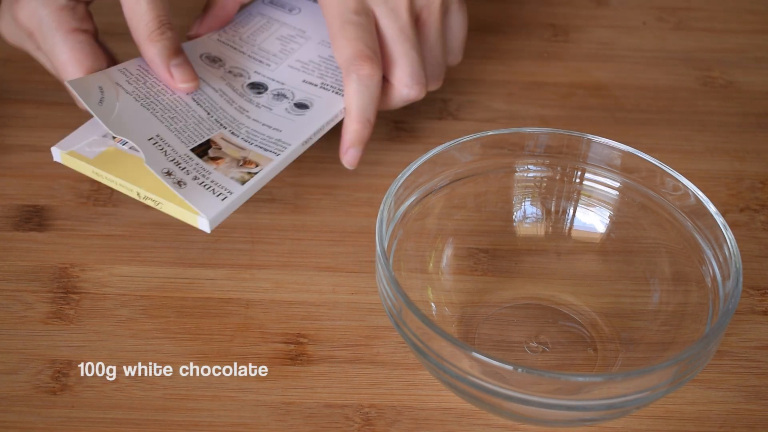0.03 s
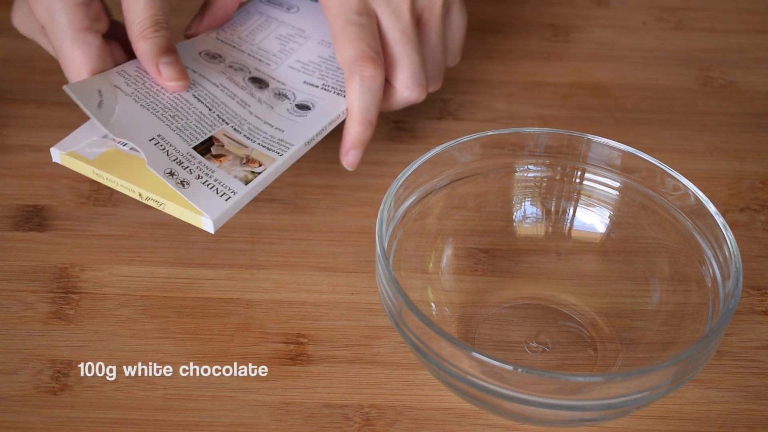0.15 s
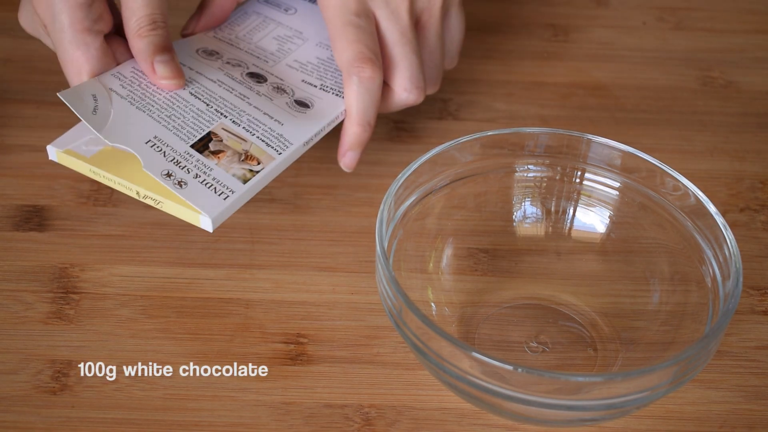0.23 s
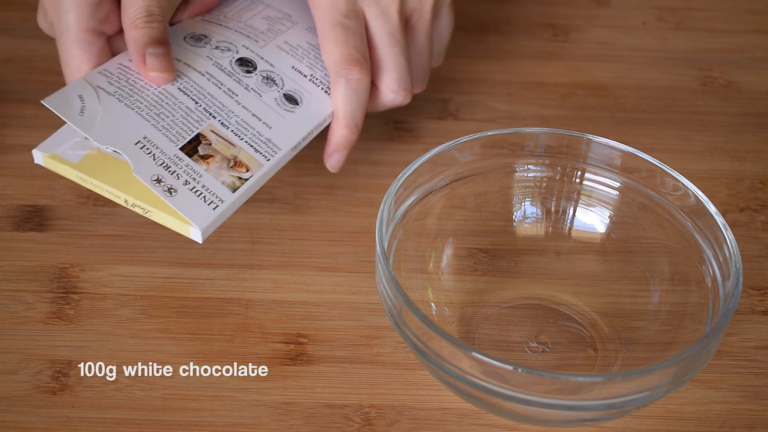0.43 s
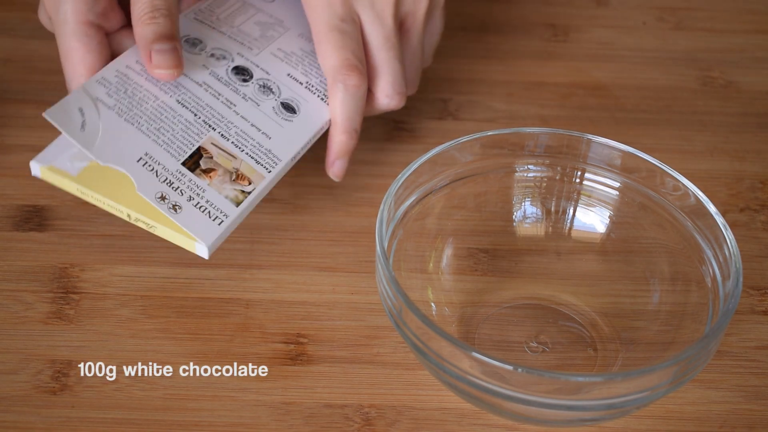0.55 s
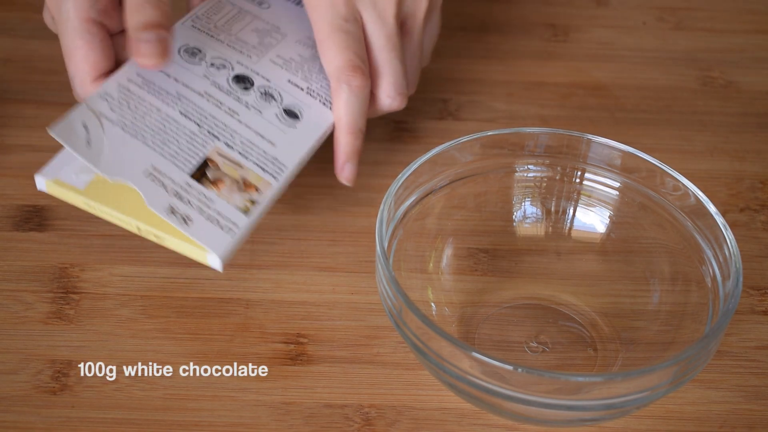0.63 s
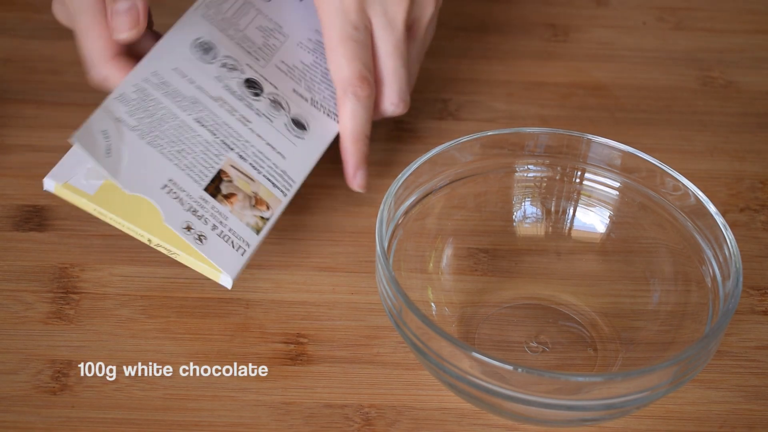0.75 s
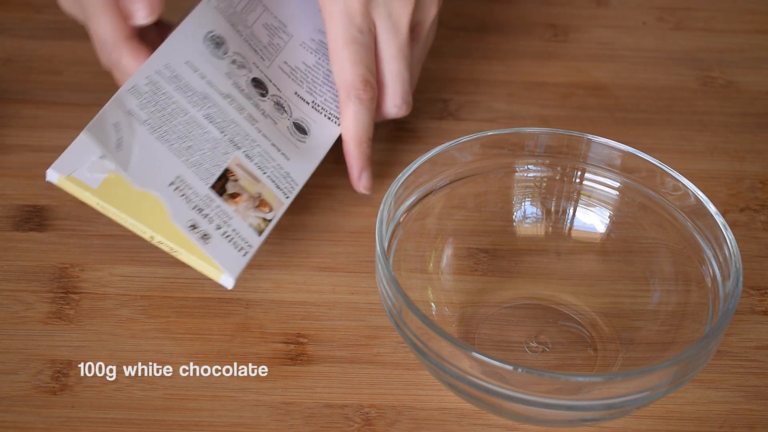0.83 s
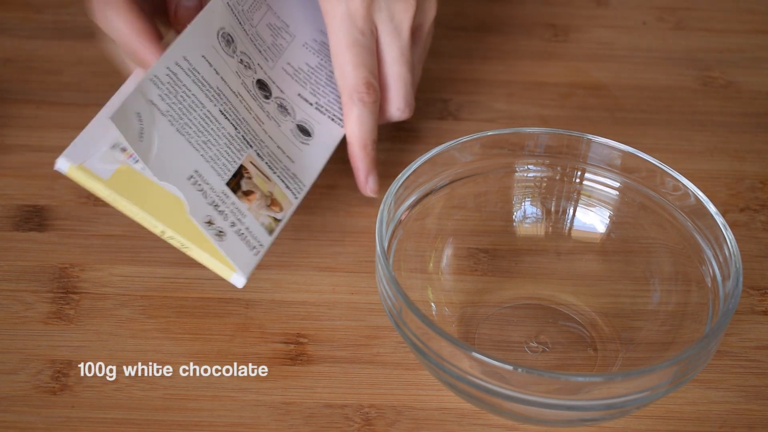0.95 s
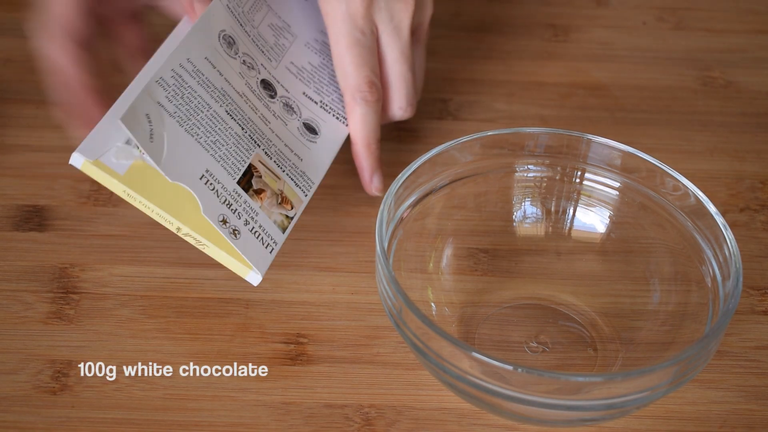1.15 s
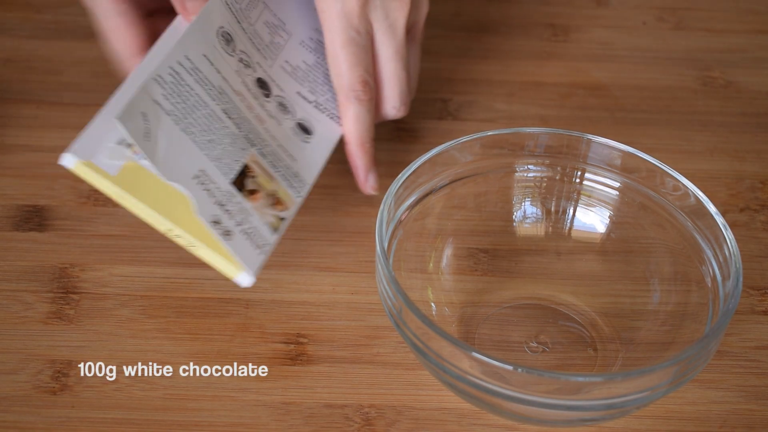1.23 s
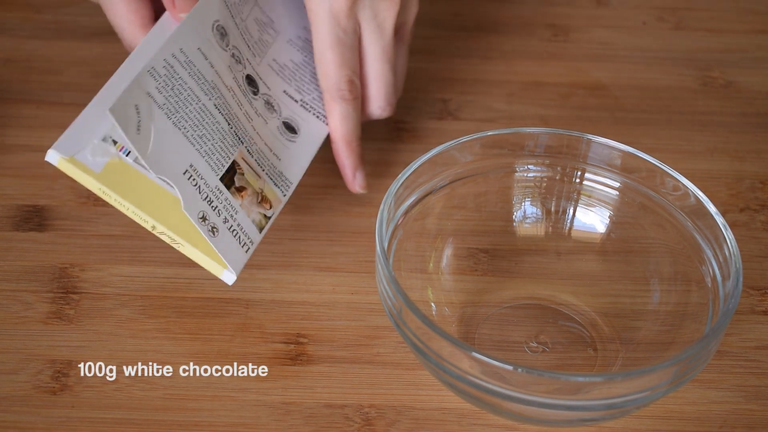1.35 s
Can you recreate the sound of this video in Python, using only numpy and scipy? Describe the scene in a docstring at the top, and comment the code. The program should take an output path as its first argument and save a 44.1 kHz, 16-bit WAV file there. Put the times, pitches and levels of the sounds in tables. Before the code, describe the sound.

A chocolate bar breaks inside its card and foil wrapper, close by in a kitchen. Faint crinkling leads to a dull knock and a bright snap, then fingers slide softly over the card.

```python
"""A chocolate bar is broken inside its card and foil wrapper, close by in a kitchen.
The wrapper crinkles as the bar bends. The bar gives with one dull knock, then splits in a quick run
of bright cracks. Fingers slide over the card as the bar is turned, and two broken edges click.
The room rings briefly, over a faint rumble, hiss and appliance hum."""
import sys
import numpy as np
from scipy import signal
from scipy.fft import rfft, irfft
from scipy.io import wavfile

SR = 44100
rng = np.random.default_rng(int(sys.argv[2]) if len(sys.argv) > 2 else 0)


def output_pcm(signal):
    """Save a mono or channel-first signal as 16-bit PCM at the path in sys.argv[1].

    Samples are clipped to [-1, 1] before scaling.
    """
    pcm = np.clip(np.atleast_2d(signal).T, -1, 1) * 32767
    wavfile.write(sys.argv[1], SR, np.round(pcm).astype(np.int16))


N = 61739

# A "tone" table says how strong the low and high pitches are. ring_s is the time to fade by 60 dB.
# kitchen rumble and hiss: pitch_hz, level_db
BACKGROUND_TONE = [(20, -33), (40, -22), (58, -6), (85, -12), (120, -6), (200, -4.5), (340, -2.5),
                   (500, -9), (800, -12), (1400, -17), (4000, -27), (15500, -23.5)]
# appliance hum: pitch_hz, level_db
HUM_NOTES = [(59, -65), (298, -65), (358, -65.5)]
# hiss that differs between the ears: pitch_hz, level_db
STEREO_HISS_TONE = [(20, -11), (60, 0), (120, -3), (400, -2), (1500, -14), (5000, -14), (15500, -6.5)]
# how hard the wrapper is bent: time_s, level_db
BEND_LEVELS = [(0, -42), (.05, -35), (.075, -55), (.115, -41), (.13, -35.5), (.175, -41.5), (.205, -41),
               (.222, -32.5), (.25, -42.5), (.33, -59), (.38, -35.5), (.45, -33.5), (.7, -61.5),
               (1.28, -62.5), (1.31, -42), (1.4, -46.5)]
# crackle of the bending wrapper: pitch_hz, level_db
BEND_TONE = [(100, -7), (400, -5), (1000, -4.5), (2000, 3), (3500, 1.5), (6000, 0.5), (7500, -9.5),
             (11000, -13.5), (15500, -27)]
# foil, also used for chocolate grit: pitch_hz, level_db
FOIL_TONE = [(100, -20), (400, 1), (900, 1.5), (2000, -1), (3600, 1.5), (6000, -7), (7500, -9.5),
             (11000, -4.5), (15500, -14)]
# single crinkles of the wrapper: start_s, level_db, pitch_hz, fade_s
CRINKLE_EVENTS = [(.0090, -27, 3300, 0.0018), (.0334, -30.5, 4950, 0.00068), (0.044, -29, 3240, 0.0011),
                  (0.0901, -20.5, 2870, 0.0012), (0.0941, -30, 1010, .002), (.0990, -25, 3400, 0.0012),
                  (.1205, -24.5, 1940, 0.002), (0.1487, -23, 4520, 0.00099), (.1630, -24.5, 4400, 0.0028),
                  (0.189, -30.5, 4400, 0.0015), (.2143, -15.5, 5270, 0.001), (.2174, -20, 3200, .001),
                  (.2700, -26, 5130, 0.0011), (0.3808, -19, 6030, 0.001), (0.4065, -19, 5200, 0.0013),
                  (0.5438, -37, 3000, 0.0014), (0.7611, -30, 6100, 0.0011), (0.8198, -33, 6000, 0.00091),
                  (0.8678, -30, 9000, 0.0012), (0.985, -30, 4700, 0.0011), (1.0280, -26, 3380, .0004),
                  (1.063, -36, 11000, 0.00071), (1.1516, -42.5, 2280, 0.0036),
                  (1.2965, -34.5, 2740, 0.0018), (1.326, -27, 2460, 0.0009), (1.3302, -25, 3100, 0.0011),
                  (1.3522, -28.5, 5100, 0.0019), (1.3647, -25.5, 5150, 0.0016), (1.3806, -30, 5600, 0.0017)]
# jolts in the bar (two as it strains, the first break, the final parting): start_s, level_db
JOLTS = [(.0900, -31.5), (0.1204, -30), (0.2298, -0.5), (.3990, -16.5)]
# notes of the whole bar in its card sleeve: pitch_hz, level_db, ring_s
BAR_NOTES = [(110, -20, 0.013), (371, -17, 0.035), (674, -5, 0.018), (1114, -3, 0.009), (1412, -8.5, .022),
             (1698, 0.5, 0.012), (2224, -0.5, 0.0079), (2680, -1.5, 0.007)]
# cracks of the final split: start_s, level_db, pitch_hz, width_octaves, grit_offset_db
CRACK_EVENTS = [(.3660, -21, 5800, 0.96, -3), (0.3858, 1, 4540, 0.85, -11.5),
                (0.3905, 6.5, 1985, 0.83, -24.5), (0.3932, -3.5, 3960, 0.66, -3),
                (0.3994, 0.5, 5300, .9, -10)]
# notes of the broken pieces: pitch_hz, level_db, ring_s
PIECE_NOTES = [(457, -18.5, 0.021), (810, -6.5, 0.012), (960, -8.5, 0.0077), (2038, -9.5, 0.015),
               (2370, -9, 0.0091), (2884, -6.5, 0.0074), (3714, -10.5, 0.0092), (5090, -8.5, 0.0093),
               (5850, -2.5, 0.0066), (7320, -7, 0.0052), (9950, -8.5, 0.0049), (11450, -21, 0.012)]
# fingers sliding on the card: time_s, level_db
SLIDE_LEVELS = [(.5, -57), (.58, -47.5), (.66, -46), (.72, -59), (.78, -45), (.84, -44), (.89, -36),
                (.945, -43), (.99, -35), (1.04, -43), (1.075, -39.5), (1.11, -59.5), (1.2, -60.5)]
# rubbed card: pitch_hz, level_db
CARD_TONE = [(100, -45), (500, -19), (1300, -6.5), (1750, 1), (2100, 1.5), (3000, -2), (5000, -4.5),
             (8000, -15.5), (10500, -12.5), (15500, -28.5)]
# brightness of the slide: time_s, tilt_db_per_octave
SLIDE_BRIGHTNESS = [(.65, -0.5), (.8, 0), (.9, 0.2), (1.0, 3)]
# notes of the broken edges: pitch_hz, level_db, ring_s
EDGE_NOTES = [(4030, 2, 0.013), (6100, -2, 0.014), (7400, 1, 0.0046), (10400, -1, 0.0082)]
# ringing of the room: pitch_hz, ring_s, level_db
ROOM_BANDS = [(100, .4, -15), (300, 0.49, -9.5), (800, 0.5, -10.5), (2040, 0.56, -12.5), (5000, 0.44, -10),
              (8800, 0.46, -6.5), (14900, .25, -25)]
# first echoes from the worktop and walls: delay_s, level_db
FIRST_ECHOES = [(.0094, -19), (.0139, -23.5)]


def amp(db):
    """Turns decibels into a number to multiply by."""
    return 10 ** (np.asarray(db) / 20)


def unit_level(x):
    """Scales a sound to an average (rms) level of 1."""
    return x / np.sqrt(np.mean(x ** 2) + 1e-20)


def at_pitch(points, hz):
    """Looks up a table by pitch, blending between rows."""
    pitch_hz, value = np.transpose(points)
    return np.interp(np.log(hz + 1), np.log(pitch_hz + 1), value)


def over_time(points):
    """Joins (time_s, value) points with straight lines."""
    return np.interp(np.arange(N) / SR, *np.transpose(points))


def add(mix, start_s, sound):
    """Mixes a sound in at its start time."""
    part = mix[max(round(start_s * SR), 0):][:len(sound)]
    part += sound[:len(part)]


def hump(hz, pitch_hz, octaves):
    """Favours a broad range around one pitch."""
    return 1 / (1 + (np.log2((hz + 1) / pitch_hz) / octaves) ** 2)


def shape_tone(x, tone, pitch_hz=None, octaves=1):
    """Filters a sound by a tone table and an optional hump, ending at level 1."""
    hz = np.fft.rfftfreq(len(x), 1 / SR)
    gain = amp(at_pitch(tone, hz)) * (hump(hz, pitch_hz, octaves) if pitch_hz else 1)
    return unit_level(irfft(rfft(x) * gain, len(x)))


def ring(notes, drive, size=4096):
    """A sudden release rings an object's notes; drive(hz) says how hard each pitch is pushed."""
    hz = np.fft.rfftfreq(size, 1 / SR) + 1
    pitch_hz, level_db, ring_s = np.array(notes).T[:, :, None]
    fade_s = ring_s / np.log(1000)
    off_pitch = np.pi * fade_s * (hz - pitch_hz ** 2 / hz)
    power = (amp(level_db) * fade_s * SR / 2) ** 2 / (1 + off_pitch ** 2)
    strength = np.sqrt(power.sum(0)) * drive(hz)
    # pack the energy at the start, like a hit (minimum phase)
    cepstrum = irfft(np.log(strength + 1e-4), size)
    forward_only = np.r_[1, np.full(size // 2 - 1, 2), 1, np.zeros(size // 2 - 1)]
    return irfft(np.exp(rfft(cepstrum * forward_only)), size)


def burst(pitch_hz, octaves, rise_s, fade_s, size=1024):
    """Tiny tears swell and die in milliseconds; returns the time to the peak, and the sound."""
    t = (np.arange(size) - size // 8) / SR
    swell = np.exp(-np.where(t < 0, -t / rise_s, t / fade_s))
    sound = swell * shape_tone(rng.standard_normal(size), FOIL_TONE, pitch_hz, octaves)
    return -t[0], unit_level(sound) * np.sqrt(np.mean(swell ** 2))


def ticks(per_s, spread_db):
    """Random clicks of uneven size."""
    size = amp(spread_db * np.minimum(rng.exponential(1, N), 4))
    return size * rng.choice([-1, 1], N) * (rng.random(N) < per_s / SR)


def background():
    """Low rumble and hiss with a faint appliance hum."""
    t = np.arange(N) / SR
    hum = sum(amp(db) * np.sqrt(2) * np.sin(2 * np.pi * (hz * t + rng.random())) for hz, db in HUM_NOTES)
    return hum + amp(-49) * shape_tone(rng.standard_normal(N), BACKGROUND_TONE)


def wrapper():
    """The wrapper crackles as it bends, fizzes as the foil stretches, and gives sharp crinkles."""
    out = amp(over_time(BEND_LEVELS)) * shape_tone(ticks(per_s=1700, spread_db=1.5), BEND_TONE)
    stretch = over_time([(0.09, 0), (0.17, 1), (0.45, 0)])
    fizz = shape_tone(ticks(per_s=2000, spread_db=5), FOIL_TONE, pitch_hz=10900)
    out += amp(-42) * stretch ** 2 * fizz
    for start_s, level_db, pitch_hz, fade_s in CRINKLE_EVENTS:
        lead_s, crinkle = burst(pitch_hz, octaves=1.01, rise_s=0.00031, fade_s=fade_s)
        add(out, start_s - lead_s, amp(level_db) * crinkle)
    return out


def bar_knocks(muffle_hz=2610):
    """Each jolt rings the whole bar; the brief contact of the knock leaves the high pitches weak."""
    out = np.zeros(N)
    knock = ring(BAR_NOTES, lambda hz: 1 / np.sqrt(1 + (hz / muffle_hz) ** 9))
    for start_s, level_db in JOLTS:
        add(out, start_s, amp(level_db) * knock)
    return out


def bar_cracks():
    """Each crack rings the broken pieces and sheds grit."""
    out = np.zeros(N)
    for start_s, level_db, pitch_hz, octaves, grit_offset_db in CRACK_EVENTS:
        crack = ring(PIECE_NOTES, lambda hz: hump(hz, pitch_hz, octaves))
        add(out, start_s, amp(level_db) * crack)
        lead_s, grit = burst(pitch_hz, octaves, rise_s=0.0011, fade_s=0.0012)
        add(out, start_s - lead_s, amp(level_db + grit_offset_db) * grit)
    return out


def fingers():
    """Skin slips on card in many tiny steps, brighter or duller as the grip changes."""
    slips = shape_tone(ticks(per_s=9000, spread_db=2.5), CARD_TONE)
    hz, t, bands = signal.stft(slips, SR, nperseg=256)
    octaves = np.log2(np.maximum(hz, 500) / 3000)  # the tone tips like a seesaw around 3000 Hz
    tilt_db = octaves[:, None] * np.interp(t, *np.transpose(SLIDE_BRIGHTNESS))
    slide = signal.istft(bands * amp(tilt_db), SR)[1][:N]
    return amp(over_time(SLIDE_LEVELS)) * slide


def edge_click():
    """Two broken edges touch and ring briefly."""
    return amp(-21.5) * ring(EDGE_NOTES, lambda hz: hump(hz, pitch_hz=5460, octaves=0.59))


def room_ring(sound, gap_s=0.0062, build_s=0.0054):
    """After a short gap the room returns a blur of echoes, each pitch fading at its own speed."""
    t = np.arange(SR) / SR
    echoes = rng.standard_normal(SR) * (rng.random(SR) < 0.15)
    hz, age_s, bands = signal.stft(unit_level(echoes), SR, nperseg=256)
    room = np.array(ROOM_BANDS)
    ring_s = at_pitch(room[:, [0, 1]], hz)[:, None]
    level_db = at_pitch(room[:, [0, 2]], hz)[:, None]
    fade = amp(level_db - 60 * age_s / ring_s)
    balance = np.sqrt(2 * np.log(1000) / (ring_s * SR))  # ringing longer adds no energy
    tail = signal.istft(bands * fade * balance, SR)[1][:SR]
    fade_in = np.clip((t - gap_s) / build_s, 0, 1)
    return signal.fftconvolve(sound, tail * fade_in)[:N]


def scene():
    """Everything sits in the centre; only hiss and a trace of the room differ between the ears."""
    near = bar_knocks() + bar_cracks() + wrapper() + fingers()
    add(near, start_s=1.0709, sound=edge_click())
    centre = near + room_ring(near) + background()
    for delay_s, level_db in FIRST_ECHOES:
        add(centre, delay_s, amp(level_db) * near)
    hiss = amp(-61) * shape_tone(rng.standard_normal(N), STEREO_HISS_TONE)
    side = hiss + amp(-62) * room_ring(near)
    return np.array([centre + side, centre - side])


def record(dry, top_hz=15850):
    """Rounds off the loudest peaks as they overload, then cuts the highest treble."""
    rounded = dry / (1 + abs(dry) ** 8) ** (1 / 8)
    treble_cut = signal.firwin(511, top_hz, window=("kaiser", 9), fs=SR)
    return signal.oaconvolve(rounded, treble_cut[None], "same")


dry = scene()
out = record(dry)
output_pcm(out)
```